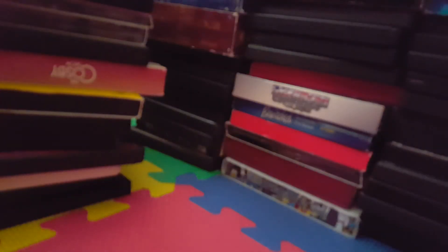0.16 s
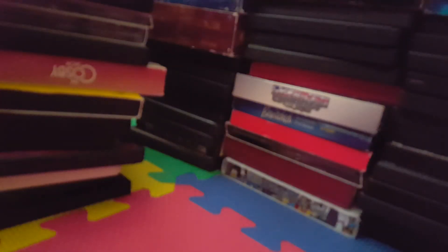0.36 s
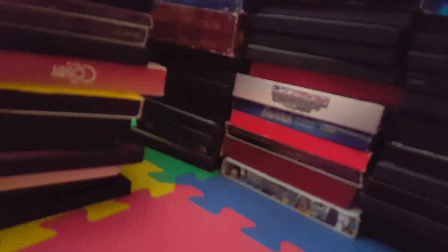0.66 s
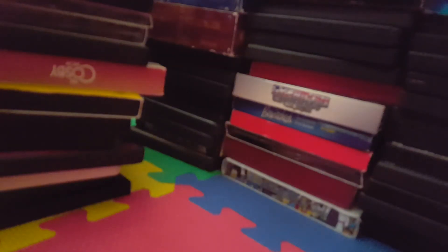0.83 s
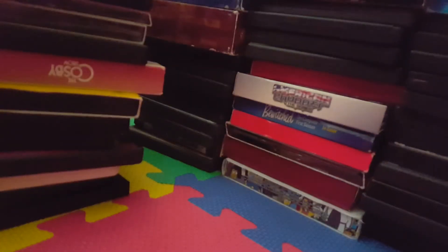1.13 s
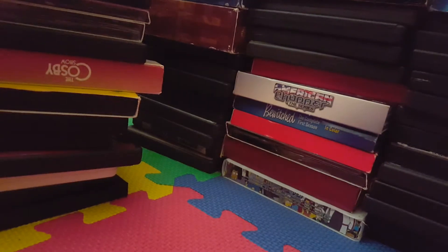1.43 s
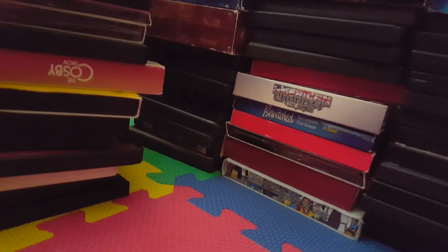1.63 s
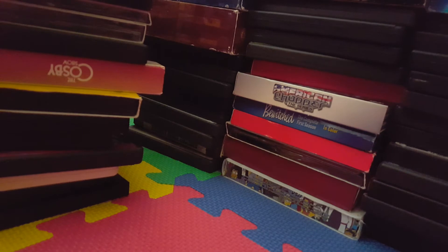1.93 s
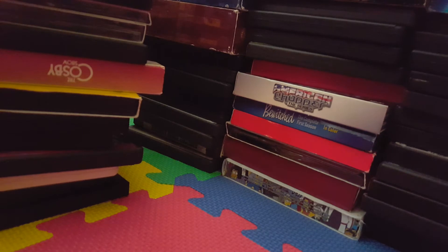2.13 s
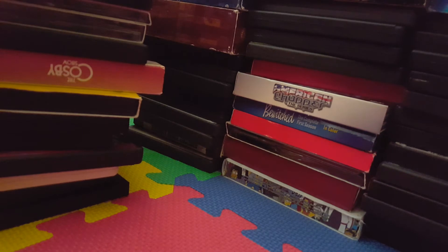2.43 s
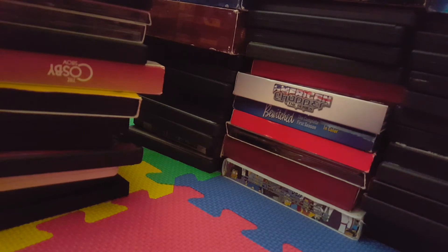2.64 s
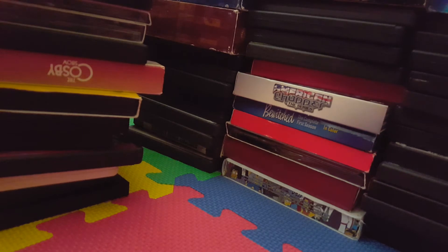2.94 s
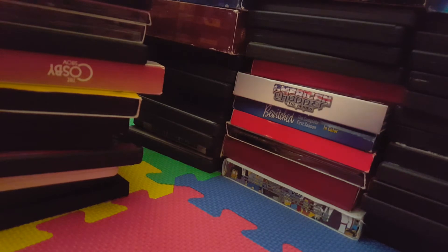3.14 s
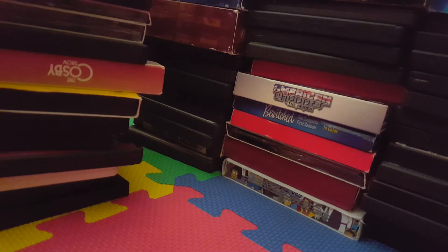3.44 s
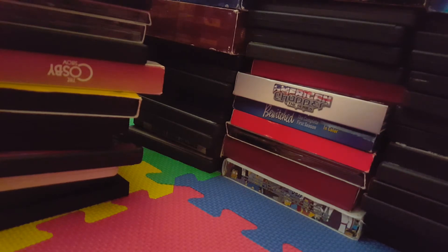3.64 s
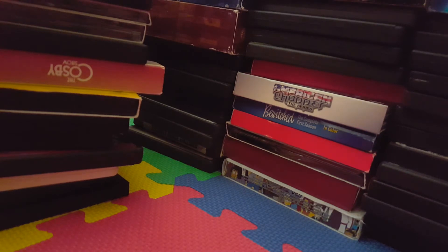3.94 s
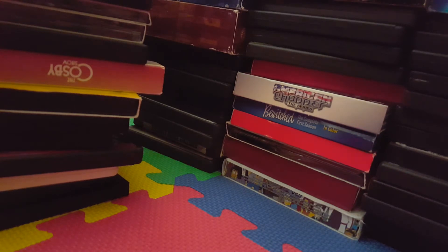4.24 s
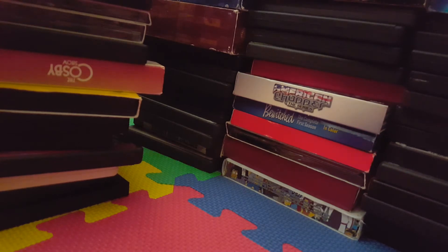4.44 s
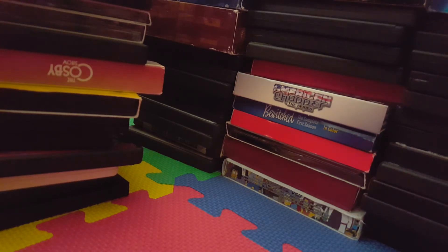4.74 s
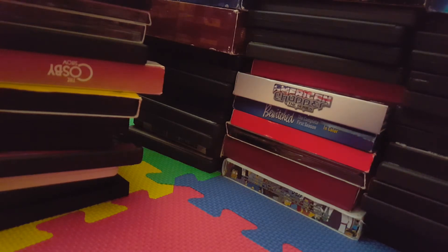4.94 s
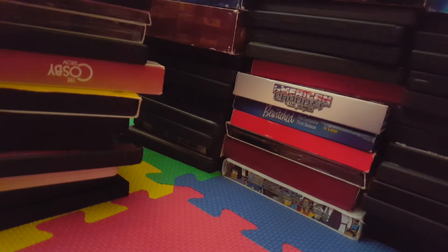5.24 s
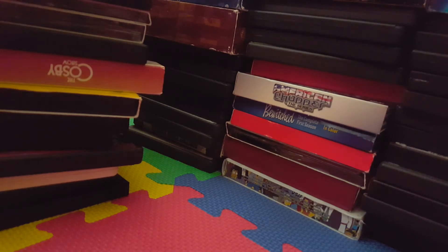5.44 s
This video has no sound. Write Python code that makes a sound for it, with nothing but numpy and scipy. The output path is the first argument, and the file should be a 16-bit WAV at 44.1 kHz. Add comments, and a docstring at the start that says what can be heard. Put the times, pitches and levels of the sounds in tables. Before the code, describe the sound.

Close, uneven plastic clacks, soft hollow knocks and short scrapes as hands shift disc cases, with faint steady room tone beneath.

```python
"""Handling plastic disc cases

Plastic disc cases are handled up close, between stacks of cases in a quiet room with a faint steady tone.
Edges click as filtered impulses with chatter and a ring, and set off brief rattles of random knocks.
Hollow shells bump as short low swings; strokes scrape and squeak as stick-slip noise through resonances.
Sleeves slide as coloured hiss, fingers rumble and tap, and sparse random echoes give the reflections."""
import sys
import numpy as np
from scipy import signal
from scipy.fft import rfft, irfft
from scipy.io import wavfile

SR = 44100
rng = np.random.default_rng(int(sys.argv[2]) if len(sys.argv) > 2 else 0)


def file_out(sig):
    """Save sig as 16-bit WAV at sys.argv[1]."""
    # one column per channel
    cols = np.atleast_2d(sig).T
    # limit, then scale
    lim = np.clip(cols, -1, 1)
    pcm = np.round(lim * 32767).astype(np.int16)
    wavfile.write(sys.argv[1], SR, pcm)


N = 246519
BINS = np.fft.rfftfreq(2048, 1 / SR)  # the frequencies at which filters are drawn, Hz
EDGE_HZ = 16050  # upper band limit

# room tone colour: f/Hz, density/dB
AIR_COLOUR = [(20, -35), (60, 5), (700, 7), (1300, -6), (2500, 0), (5000, -33), (16000, -39)]
# decay of the room: f/Hz, t60/s
ROOM_DECAY = [(100, 0.53), (260, 0.51), (700, 0.32), (1800, 0.34), (13000, 0.31)]
# colour of what the stacks and the room send back: f/Hz, gain/dB
RETURN_COLOUR = [(60, -5), (160, 1.5), (500, -4), (2200, -4.5), (14000, -2.5)]
# difference between the two microphone ports: f/Hz, side minus mid level/dB
PORT_WIDTH = [(60, -10), (150, -18.5), (700, -6.5), (1300, 0), (15000, -0.5)]
# colour of the dull rumble of gripping fingers: f/Hz, density/dB
FINGER_COLOUR = [(20, -24), (60, 7), (150, 5.5), (300, 0.5), (600, -10), (1300, -6), (6000, -36.5)]
# a sleeve slides over a smooth cover: fastest t/s, rise/s, fall/s, hiss level before trim/dB,
# left minus right level/dB
SLIDES = [(0.06, 0.13, 0.092, -51.5, 9), (0.155, 0.05, 0.063, -45.5, 6), (0.333, 0.036, 0.1, -52.5, 12.5),
          (0.51, 0.12, 0.15, -57.5, 7.5), (1.03, 0.18, 0.22, -50.5, 1.5), (1.25, 0.5, 0.2, -49.5, 0.5),
          (1.68, 0.25, 0.23, -48, 3), (1.81, 0.21, 0.075, -52.5, 2.5), (2.48, 0.13, 0.11, -48.5, 2.5),
          (2.644, 0.093, 0.069, -48, -0.5), (2.909, 0.082, 0.11, -53, -1), (3.335, 0.13, 0.1, -42.5, 0.5),
          (3.634, 0.023, 0.023, -40, -1.5), (3.8, 0.3, 1, -56, -0.5), (4.44, 0.16, 0.17, -58, 4),
          (4.6, 0.089, 0.062, -51.5, 2), (4.93, 0.31, 0.33, -54.5, -1.5)]
# colour of the sliding hiss: f/Hz, density/dB
HISS_COLOUR = [(200, -10.5), (500, 7.5), (1000, 4.5), (3000, 6), (4500, -0.5), (9000, -3.5), (12500, 1.5),
               (16000, -9.5)]
# rubs that briefly catch a pitch: middle t/s, half length/s, pitch f/Hz, level/dB
SQUEAKS = [(0.062, 0.033, 542, -38.5), (0.48, 0.02, 235, -34), (3.332, 0.03, 1490, -39.5),
           (3.576, 0.013, 429, -35), (3.585, 0.022, 794, -43)]
# scraping strokes: fastest t/s, rise/s, fall/s, level/dB, brightness/dB per octave, panel f/Hz
STROKES = [(0.062, 0.085, 0.091, -39.5, 1, 574), (0.154, 0.035, 0.019, -33.5, -6, 593),
           (0.253, 0.11, 0.025, -51.5, 6, 2330), (0.3, 0.009, 0.012, -47, 6.5, 2770),
           (0.372, 0.078, 0.053, -39, 0.5, 580), (0.494, 0.075, 0.094, -51.5, 1, 2750),
           (0.621, 0.03, 0.039, -54, 13, 2380), (1.115, 0.061, 0.014, -48, 3, 333),
           (1.265, 0.012, 0.11, -50, 6.5, 810), (1.541, 0.012, 0.016, -42.5, 0.5, 820),
           (1.85, 0.027, 0.024, -47, 6, 2460), (1.985, 0.051, 0.015, -51, 6, 1220),
           (2.034, 0.044, 0.028, -53, -8, 1080), (2.087, 0.038, 0.024, -55, 4, 1440),
           (2.15, 0.041, 0.14, -59, -2, 148), (2.434, 0.04, 0.05, -30, 0.5, 936),
           (2.48, 0.015, 0.076, -41.5, 2.5, 480), (2.629, 0.026, 0.1, -38.5, 1, 814),
           (2.82, 0.05, 0.045, -50, 3.5, 1020), (2.935, 0.11, 0.075, -47, 2, 995),
           (3.05, 0.065, 0.062, -55.5, 3.5, 1140), (3.135, 0.013, 0.1, -46, 4.5, 880),
           (3.183, 0.025, 0.1, -48, 5, 470), (3.313, 0.048, 0.057, -41.5, 3, 1750),
           (3.43, 0.13, 0.023, -41, -1.5, 650), (3.572, 0.06, 0.025, -45.5, 7.5, 714),
           (3.633, 0.025, 0.013, -36.5, 4, 627), (3.715, 0.14, 0.15, -46, 5, 754),
           (3.813, 0.02, 0.089, -38, 6.5, 490), (4.006, 0.089, 0.068, -40.5, 1, 503),
           (4.061, 0.032, 0.12, -45.5, 4.5, 513), (4.132, 0.005, 0.0075, -43, 0.5, 2480),
           (4.269, 0.055, 0.094, -37.5, -2, 1025), (4.406, 0.016, 0.097, -38.5, 0, 970),
           (4.46, 0.011, 0.054, -45.5, -6.5, 1900), (4.605, 0.06, 0.076, -46, 1, 226),
           (4.686, 0.02, 0.037, -45.5, 3.5, 2130), (4.774, 0.0059, 0.016, -45.5, 4, 540),
           (4.856, 0.031, 0.093, -40.5, -1, 493), (4.947, 0.032, 0.025, -39, -5.5, 516),
           (5.064, 0.059, 0.067, -42, -1, 267), (5.341, 0.026, 0.12, -53, -1, 890),
           (5.472, 0.035, 0.013, -42.5, 2, 1010)]
# colour of a scraped shell: f/Hz, density/dB
SCRAPED_COLOUR = [(40, -14.5), (200, 11.5), (330, 4), (500, 8.5), (750, -8.5), (1350, -7.5), (1750, -15),
                  (3500, -30.5), (9000, -43), (16000, -40.5)]
# modes of a hollow shell, struck or scraped: f/Hz, height/dB
SHELL_MODES = [(830, 3.5), (1250, 2), (1500, 2), (2450, 4.5), (4400, 2.5)]
# soft bumps of a case: t/s, level before trim/dB, pitch f/Hz
BUMPS = [(0.153, -33, 153), (0.302, -43, 153), (0.337, -39.5, 133), (0.386, -39, 232), (0.921, -45, 133),
         (0.953, -38.5, 290), (1.098, -31.5, 128), (1.263, -37, 150), (1.309, -38.5, 156),
         (1.385, -27.5, 102), (1.539, -41.5, 135), (1.706, -24, 167.5), (1.842, -33, 110), (1.895, -36, 96),
         (1.993, -43.5, 161), (2.082, -45, 113), (2.268, -45, 148), (2.418, -30, 247), (2.476, -33.5, 162),
         (2.524, -40, 160), (2.664, -36, 84), (3.134, -42, 158), (3.359, -27, 140), (3.436, -34, 177),
         (3.62, -39.5, 173), (3.8, -21, 227), (3.891, -30.5, 107), (4.057, -37.5, 124), (4.4, -36, 180),
         (4.451, -34, 225), (4.584, -42, 210), (5.06, -35.5, 238), (5.099, -30.5, 154), (5.188, -30, 110),
         (5.334, -31, 143), (5.396, -42.5, 143), (5.462, -34, 164)]
# edges that catch: t/s, shell clack level/dB, ring f/Hz, ring level/dB, snap level/dB, lead of the left/ms
CLICKS = [(0.156, -41, 616, -28, -49, 0.57), (0.341, -43, 970, -61, -68, 0.56),
          (0.715, -47.5, 1210, -55, -63, -0.011), (0.847, -62, 4430, -67, -44, 0.046),
          (0.925, -49, 2790, -68, -51, -0.28), (0.9503, -41.5, 2170, -36.5, -65, 0.1),
          (1.053, -43, 3320, -50, -41, 0.44), (1.0938, -35, 1880, -50, -50, 0.25),
          (1.385, -21.5, 817, -26.5, -31.5, 0.15), (1.3866, -29, 1586, -27, -34.5, 0.133),
          (1.705, -30.5, 920, -41, -55, -0.037), (1.7096, -24.5, 2585, -21, -46, -0.053),
          (1.836, -40.5, 2600, -42, -78, -0.18), (1.894, -47, 1005, -43.5, -73, 0.054),
          (2.268, -53, 845, -57, -65, 0.11), (2.286, -54, 1400, -56, -59, -0.017),
          (2.334, -48, 1980, -60, -63, 0.069), (2.361, -45, 1130, -49, -66, -0.16),
          (2.415, -32, 1270, -43, -60, 0.1), (2.427, -27.5, 1020, -32.5, -68, -0.33),
          (2.44, -31, 1170, -32, -62, 0.22), (2.487, -34.5, 3120, -47, -48, 0.044),
          (2.528, -39.5, 2450, -50, -43.5, -0.24), (2.67, -41, 1050, -51, -81, -0.24),
          (2.835, -65, 910, -44.5, -97, 0.21), (3.189, -38.5, 3030, -38.5, -69, -0.048),
          (3.363, -46, 410, -63, -73, 0.47), (3.376, -32.5, 940, -30, -79, 0.2),
          (3.436, -43, 417, -49, -74, 0.15), (3.727, -38.5, 804, -59, -58, -0.22),
          (3.755, -35.5, 510, -35, -47, -0.1), (3.8, -28.5, 730, -26, -37, -0.021),
          (3.8038, -25, 502, -27.5, -39.5, -0.059), (3.895, -41.5, 1240, -55, -53, -0.097),
          (3.97, -34, 1300, -60, -58, -0.0073), (3.9926, -42.5, 1220, -37, -68, 0.31),
          (4.012, -40.5, 530, -50, -55, 0.21), (4.515, -46, 2160, -71, -77, 0.014),
          (5.101, -43, 563, -44, -52, 0.22), (5.1885, -37, 2980, -43.5, -52, 0.12),
          (5.1891, -33, 1375, -41, -61, -0.015), (5.189, -25, 840, -34.5, -70, 0.027),
          (5.341, -47, 877, -39.5, -79.5, 0.16), (5.456, -48, 930, -35, -61, 0.32),
          (5.479, -39.5, 1320, -38, -51.5, -0.022)]
# colour of a struck shell: f/Hz, density/dB
STRUCK_COLOUR = [(50, -41), (200, 4.5), (600, 3.5), (1000, 4.5), (1550, -3), (1850, -2), (3200, -12),
                 (9000, -19), (16000, -21)]
# colour of the snap of a hard edge: f/Hz, density/dB
SNAP_COLOUR = [(300, -25), (2000, 5.5), (4400, 8), (5500, -6), (8000, 5), (10000, 0.5), (12000, 8),
               (14000, -12), (16000, 9.5)]


def amp(db):
    """Decibels to gain."""
    return 10 ** (np.asarray(db) / 20)


def read(points, hz):
    """A table read along a logarithmic frequency axis."""
    f, value = np.transpose(points)
    return np.interp(np.log(hz + 1), np.log(f + 1), value)


def evened(x):
    """Scales to an rms of one."""
    return x / np.sqrt(np.mean(x ** 2) + 1e-20)


def blow(x):
    """Scales a short sound to the energy of 10 ms at an rms of one."""
    energy = np.sum(np.atleast_2d(x) ** 2, axis=1).mean()
    return x * np.sqrt(SR / 100 / (energy + 1e-20))


def add(mix, s, sound):
    """Mixes a sound into a stereo mix at time s."""
    part = mix[:, max(round(s * SR), 0):][:, :sound.shape[1]]
    part += sound[:, :part.shape[1]]


def colour(x, db):
    """Causal minimum-phase filter with the gain db at BINS."""
    cepstrum = irfft(np.log(amp(db)))
    half = len(cepstrum) // 2
    # folding the cepstrum forward in time makes the filter minimum-phase
    folded = np.r_[cepstrum[0], 2 * cepstrum[1:half]]
    taps = irfft(np.exp(rfft(folded, 2 * half)))
    return signal.fftconvolve(x, taps[None], axes=1)[:, :x.shape[1]]


def resonate(x, hz, width_hz):
    """A resonance that follows the curve hz: shift down to zero, smooth twice, shift back up."""
    turn = np.exp(2j * np.pi * np.cumsum(hz) / SR)
    r = np.exp(-np.pi * width_hz / SR)
    once = signal.lfilter([1 - r], [1, -r], x / turn)
    twice = signal.lfilter([1 - r], [1, -r], once)
    return 2 * (turn * twice).real


def shell_peaks(width=.07):
    """The lift in dB that the shell's well-damped modes give at BINS; width is relative to each mode."""
    return sum(db / (1 + ((BINS / hz - 1) / width) ** 2) for hz, db in SHELL_MODES)


def ports(pair):
    """Two unrelated signals become left and right: alike in the bass, apart in the treble."""
    mid = pair[0]
    side = colour(pair[1:], read(PORT_WIDTH, BINS))[0]
    return np.array([mid + side, mid - side])


def wander(length, rate_hz):
    """Smooth chance: random knots joined by straight lines, with an rms a little under one."""
    knots = rng.standard_normal(int(length / SR * rate_hz) + 2)
    return np.interp(np.arange(length) * rate_hz / SR, np.arange(len(knots)), knots)


def gesture(peak_s, rise_s, fall_s, curve):
    """A hand speeds up and slows down: its samples, with a still tail for ringing, and its speed (0-1)."""
    start, end = peak_s - rise_s, peak_s + fall_s
    at = np.arange(max(int(start * SR), 0), min(int(end * SR) + len(BINS), N))
    ramp = np.interp(at / SR, [start, peak_s, end], [0, 1, 0])
    return at, np.sin(np.pi / 2 * ramp) ** curve


def slips(per_s, spread_db, smooth):
    """Stick-slip: tiny jerks of uneven size over a smooth rub."""
    happens = rng.random(N) < per_s / SR
    size = amp(spread_db * np.minimum(rng.exponential(1, N), 3)) * happens
    jerks = evened(size * rng.choice([-1., 1.], (2, N)))
    return jerks + smooth * rng.standard_normal((2, N))


def judder(per_s, uneven_octaves, soft_hz):
    """A dragged edge sticks and lets go in a loose run: each jerk a dull push and a fading crunch."""
    turns = np.cumsum(per_s * 2 ** (uneven_octaves * wander(N, rate_hz=per_s))) / SR
    jerks = np.diff(np.floor(turns), prepend=0)
    # the Hilbert pair gives two versions of the push a quarter turn apart
    wave = signal.hilbert(evened(jerks - jerks.mean()))
    # the crunch fades until the next jerk
    crunch = evened(rng.standard_normal((2, N)) * (1 - turns % 1) ** 2)
    dull = signal.butter(2, soft_hz, "low", fs=SR, output="sos")
    crisp = signal.butter(2, soft_hz, "high", fs=SR, output="sos")
    return signal.sosfilt(dull, [wave.real, wave.imag]) + signal.sosfilt(crisp, crunch)


def air(level_db=-70):
    """Faint steady room tone: coloured noise."""
    noise = ports(rng.standard_normal((2, N)))
    return amp(level_db) * evened(colour(noise, read(AIR_COLOUR, BINS)))


def room(x, near_db=-10, near_s=0.016, far_db=-15, first_s=0.011, build_s=.02):
    """Quick reflections from the stacks, then the short tail of a furnished room, as sparse echoes."""
    t = np.arange(SR // 2) / SR
    signs = rng.choice([-1., 1.], (2, 2, len(t)))
    near, far = signs * (rng.random((2, 2, len(t))) < 3000 / SR)  # about 3000 echoes per second
    near = ports(near * (t > first_s) * np.exp(-t / near_s))
    # the tail builds up, then each frequency decays at its own rate
    hz, when, z = signal.stft(far * np.minimum(t / build_s, 1), SR, nperseg=256)
    decay = amp(-60 * when / read(ROOM_DECAY, hz)[:, None])
    far = ports(signal.istft(z * decay, SR, nperseg=256)[1][:, :len(t)])
    near = amp(near_db) * near / np.linalg.norm(near[0])
    far = amp(far_db) * far / np.linalg.norm(far[0])
    return signal.fftconvolve(x, near + far, axes=1)[:, :N]


def hands(scraping, level_db=-54, settle_s=0.0044, fidget_db=6.0, tap_db=-5):
    """Fingers shift grip in dull jerks and tap the shell, the more the harder they have just scraped."""
    keep = np.exp(-1 / (settle_s * SR))
    power = signal.lfilter([1 - keep], [1, -keep], evened(scraping[0]) ** 2)
    effort_db = 10 * np.log10(power + 1e-3)
    grip = ports(slips(per_s=320, spread_db=0.5, smooth=0.55))
    rumble = evened(colour(grip, read(FINGER_COLOUR, BINS)))
    touches = ports(slips(per_s=45, spread_db=2, smooth=0))
    taps = evened(colour(touches, read(STRUCK_COLOUR, BINS) + shell_peaks()))
    moving_db = level_db + effort_db / 2 + fidget_db * wander(N, rate_hz=35)
    return (rumble + amp(tap_db) * taps) * amp(moving_db)


def sliding(gain_db=-0.46, flutter_db=2.0, curve=2.77, creep_db=-63, let_go_s=5.11, let_go_db=-8,
            catch_db=-11, edge_hz=6000, edge_db=-6):
    """Plastic hisses with its speed, catches on small scratches, and creeps, fainter as the grip loosens."""
    loose = np.clip((np.arange(N) / SR - let_go_s) / .05, 0, 1)
    level = amp(creep_db + let_go_db * loose) * np.ones((2, 1))
    halves = np.array([[.5], [-.5]])  # left, right
    for peak, rise, fall, db, left_db in SLIDES:
        at, speed = gesture(peak, rise, fall, curve)
        level[:, at] += amp(db + gain_db + left_db * halves) * speed
    scratches = slips(per_s=130, spread_db=3.5, smooth=0)
    rub = rng.standard_normal((2, N)) + amp(catch_db) * scratches
    hiss = colour(ports(rub), read(HISS_COLOUR, BINS))
    # the resonance of the sliding edge moves with the contact point
    moving_hz = edge_hz * 2 ** (wander(N, rate_hz=9) / 2)
    hiss = evened(hiss + amp(edge_db) * resonate(hiss, moving_hz, edge_hz / 2))
    return hiss * level * amp(flutter_db * wander(N, rate_hz=180))


def squeaks(width=0.091, rough_db=2):
    """The slips lock to a shell mode for a moment: noise through a resonance, short, hollow and rough."""
    t, out = np.arange(N) / SR, np.zeros(N)
    for s, half_s, hz, db in SQUEAKS:
        at = np.flatnonzero(abs(t - s) < .2)
        swell = np.exp(-((t[at] - s) / half_s) ** 2)
        noise = rng.standard_normal(len(at))
        tone = swell * resonate(noise, np.full(len(at), hz), 2 * width * hz)
        out[at] += amp(db) * evened(tone) * np.sqrt(np.mean(swell ** 2) / 2)
    return out * amp(rough_db * wander(N, rate_hz=56))


def scrapes(grip_db=2.5, curve=2.16, usual_db=-47, usual_panel_db=-3.0, damping=0.18,
            tick_db=-14, tick_hz=1900, panel_width=.3, drift_octaves=.15):
    """Strokes of judder and grit drive the shell and a panel resonance that shifts with the contact point."""
    out = np.zeros((2, N))
    jerks = judder(per_s=122, uneven_octaves=.4, soft_hz=1500)
    grit = jerks + .7 * slips(per_s=700, spread_db=3.3, smooth=.4)
    rub = ports(grit) * amp(grip_db * wander(N, rate_hz=63))
    ticks = evened(resonate(ports(jerks), np.full(N, tick_hz), tick_hz))
    shift = 2 ** (drift_octaves * wander(N, rate_hz=62))
    octaves = np.log2(np.clip(BINS, 200, 6000) / 1000)
    for peak, rise, fall, db, tilt_db, panel_hz in STROKES:
        at, speed = gesture(peak, rise, fall, curve)
        stroke = rub[:, at] * speed
        # a firmer grip damps the panel
        panel_db = usual_panel_db - damping * max(db - usual_db, 0)
        shell_db = read(SCRAPED_COLOUR, BINS) + shell_peaks() / 2 + tilt_db * octaves
        shell = evened(colour(stroke, shell_db))
        panel = evened(resonate(stroke, panel_hz * shift[at], panel_width * panel_hz))
        loudness = amp(db) * np.sqrt(np.mean(speed ** 2))
        add(out, at[0] / SR, loudness * (shell + amp(panel_db) * panel))
        add(out, at[0] / SR, amp(db + tick_db) * ticks[:, at] * speed)
    return out


def bumps(swell_s=0.0049, rattle=0.74, rattle_hz=290, low_hz=65, gain_db=2):
    """A soft push swings a hollow case for a few cycles and shakes its neighbours."""
    out, t = np.zeros((2, N)), np.arange(4096) / SR
    highs_lost = 1 + (BINS / rattle_hz) ** 4
    lows_lost = 1 + (low_hz / (BINS + 1)) ** 4
    dull_db = -10 * np.log10(highs_lost * lows_lost)
    push = t / swell_s * np.exp(-t / swell_s)
    for s, db, hz in BUMPS:
        noise = ports(rng.standard_normal((2, len(t))))
        shake = blow(colour(noise * push, dull_db))
        turn = 2 * np.pi * hz * t
        swing = blow(ports(np.array([np.sin(turn), np.cos(turn)]) * push))
        add(out, s, amp(db + gain_db) * blow(swing + rattle * shake))
    return out


def rattles(level_db=-10, decay_s=0.036, wait_s=0.0057):
    """A clack sets loose discs and neighbouring cases knocking for a moment, the more the sharper it is."""
    t, shaken = np.arange(SR // 4) / SR, np.zeros((2, N))
    shake = np.minimum(t / wait_s, 1) * np.exp(-t / decay_s)
    for s, clack_db, _, _, snap_db, _ in CLICKS:
        sharpness_db = (clack_db + 2 * snap_db) / 3
        add(shaken, s, amp(level_db + sharpness_db) * shake[None])
    knocks = ports(slips(per_s=350, spread_db=2, smooth=.3))
    return shaken * evened(colour(knocks, read(STRUCK_COLOUR, BINS) + shell_peaks()))


def clicks(graze_s=0.00064, chatter_s=0.0046, snap_s=0.0025, ring_width=0.11, chatter=0.3,
           hardness=0.42, usual_snap_db=-14, shade_db_per_ms=10):
    """An edge grazes, hits and chatters: the shell clacks, one panel rings briefly, the edge snaps."""
    out, t = np.zeros((2, N)), (np.arange(2048) - 256) / SR
    # the contact builds up just before the hit at t = 0
    before, after = np.exp(np.minimum(t, 0) / graze_s), np.maximum(t, 0)
    treble_octaves = np.log2(np.maximum(BINS / 1600, 1))
    for s, clack_db, ring_hz, ring_db, snap_db, lead_ms in CLICKS:
        chatter_noise, snap_noise = rng.standard_normal((2, 2, len(t)))
        chattering = ports(chatter_noise) * before * np.exp(-after / chatter_s) / 2
        strike = (t == 0) + chatter * chattering
        # harder contacts make the shell brighter above its main modes
        tilt_db = hardness * (snap_db - clack_db - usual_snap_db) * treble_octaves
        clack = blow(colour(strike, read(STRUCK_COLOUR, BINS) + shell_peaks() + tilt_db))
        ring = blow(resonate(strike, np.full(len(t), ring_hz), 2 * ring_width * ring_hz))
        snap_burst = snap_noise * before ** 2 * np.exp(-after / snap_s)
        snap = blow(colour(snap_burst, read(SNAP_COLOUR, BINS)))
        sound = amp(clack_db) * clack + amp(ring_db) * ring + amp(snap_db) * snap
        # the nearer port hears it sooner and louder
        lead = np.array([[.5], [-.5]]) * lead_ms
        delay_s = -lead / 1000
        placed = irfft(rfft(sound) * np.exp(-2j * np.pi * BINS * delay_s))
        add(out, s + t[0], amp(shade_db_per_ms * lead) * placed)
    return out


def scene():
    """All the handling, its reflections and the room tone."""
    scraping = scrapes()
    direct = hands(scraping) + sliding() + squeaks() + scraping + bumps() + rattles() + clicks()
    reflections = colour(room(direct), read(RETURN_COLOUR, BINS))
    return air() + reflections + direct


def record(dry):
    """The microphone loses the deepest bass; then the recorder's band limit."""
    bass_cut = signal.butter(2, 38, "high", fs=SR, output="sos")
    thinned = signal.sosfilt(bass_cut, dry)
    band_limit = signal.firwin(511, EDGE_HZ, window=("kaiser", 9), fs=SR)
    return signal.oaconvolve(thinned, band_limit[None], "same")


dry = scene()
out = record(dry)
file_out(out)
```